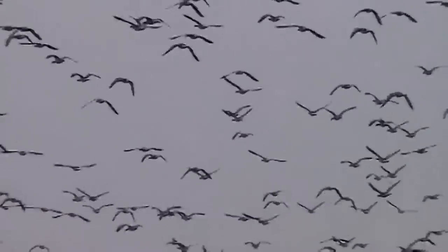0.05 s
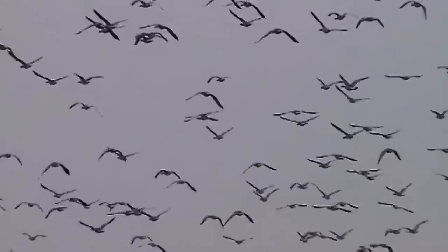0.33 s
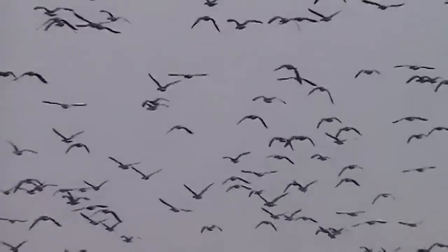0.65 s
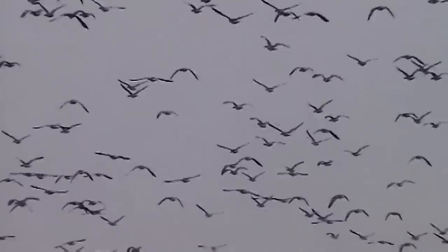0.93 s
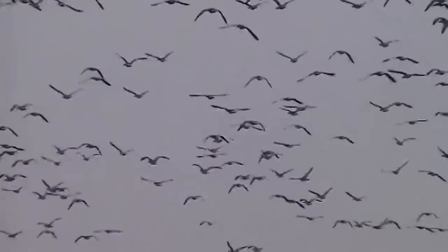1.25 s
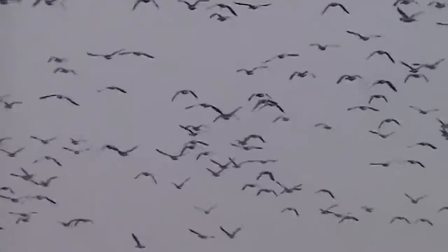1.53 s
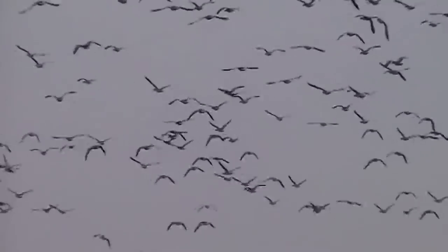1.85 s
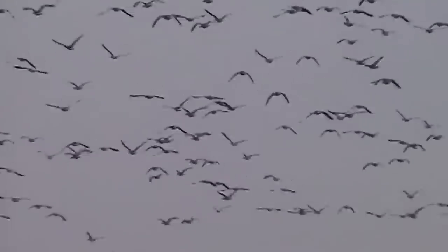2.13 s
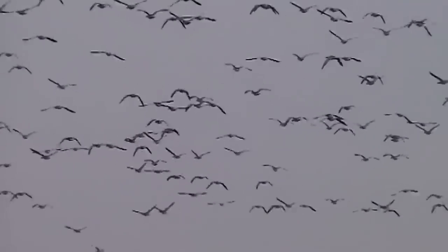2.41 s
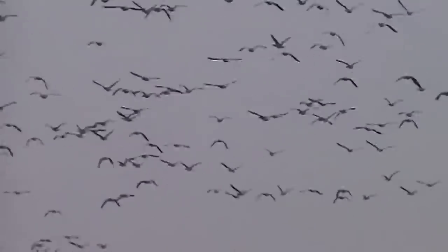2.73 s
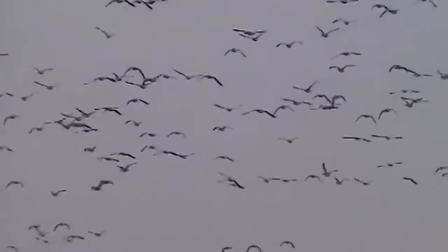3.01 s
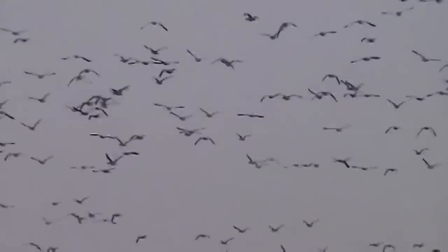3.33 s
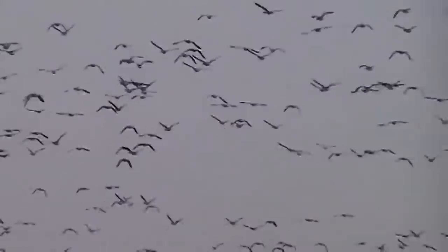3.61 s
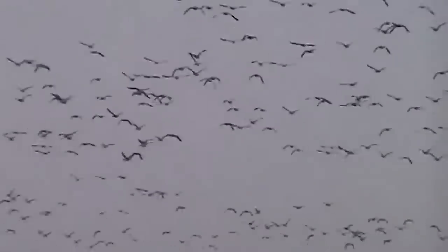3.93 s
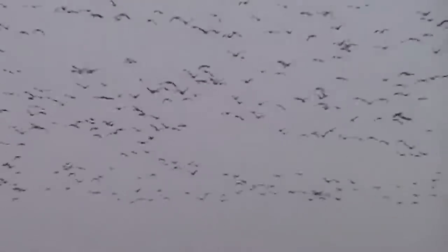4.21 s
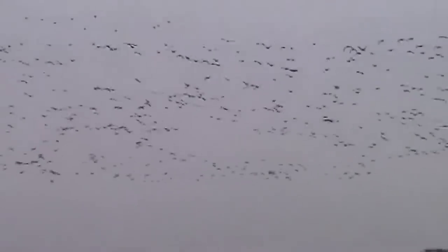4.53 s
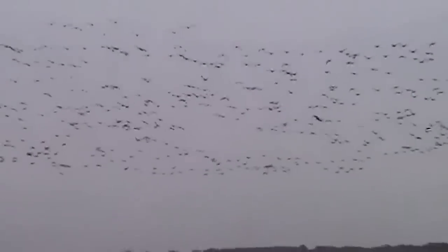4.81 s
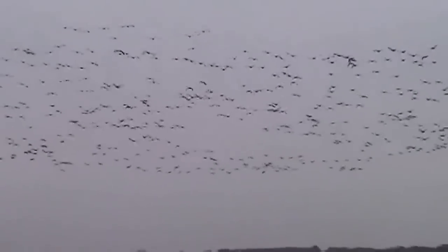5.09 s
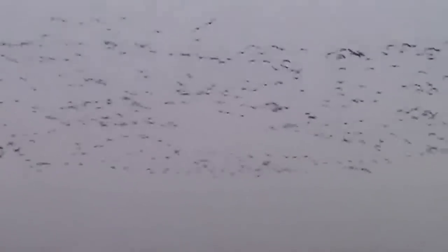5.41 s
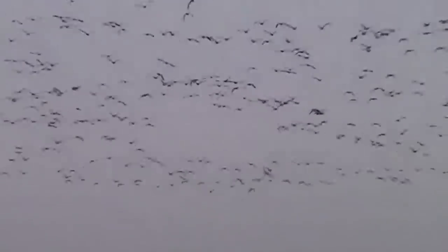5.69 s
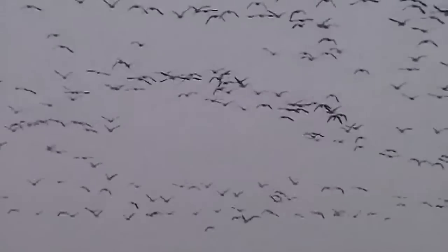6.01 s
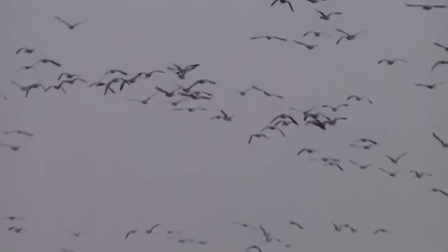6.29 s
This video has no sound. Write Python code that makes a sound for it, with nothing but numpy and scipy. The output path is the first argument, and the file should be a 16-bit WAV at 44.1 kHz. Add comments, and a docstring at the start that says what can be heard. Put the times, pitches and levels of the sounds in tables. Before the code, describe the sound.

A large flock of geese flies overhead in open country, calling from start to finish. Short, buzzy honks from near birds and higher reedy yelps stand out over an unbroken clamour of hundreds. One bird gives a hoarse bark about midway. The chorus slowly grows a little quieter and duller as the flock draws away. A very faint far engine revs in the second half, and a light breeze barely brushes the microphone.

```python
"""Open country: a large flock of geese passes overhead and slowly draws away.
Near birds honk, each joined by a few neighbours, and lone ones yelp, over a fading clamour of
hundreds and a blur of far voices. Each call is a buzz of fluttering membranes ringing in a throat.
A far engine drones, a light breeze brushes the microphone, and the camera adds a thin whine,
short whirrs and a few ticks."""
import sys
import numpy as np
from scipy import signal
from scipy.fft import rfft, irfft, next_fast_len
from scipy.io import wavfile
from scipy.ndimage import uniform_filter1d

SR = 44100
rng = np.random.default_rng(int(sys.argv[2]) if len(sys.argv) > 2 else 0)


def file_out(sig):
    """Save sig as 16-bit WAV at sys.argv[1]."""
    # one column per channel
    cols = np.atleast_2d(sig).T
    # limit, then scale
    lim = np.clip(cols, -1, 1)
    pcm = np.round(lim * 32767).astype(np.int16)
    wavfile.write(sys.argv[1], SR, pcm)


N = 280023
T = np.arange(N) / SR
HZ = np.fft.rfftfreq(next_fast_len(N), 1 / SR)

# Calls of the nearest geese: middle_s, length_s, pitch_hz, level_db, shrill_db, throat_hz
NEAR_HONKS = [(0.069, 0.13, 657.5, -29.5, 3.5, 2630), (0.266, 0.11, 430, -27, 1.5, 1800),
              (0.389, 0.12, 454.3, -28, 2, 1800), (0.551, 0.07, 446, -24.5, -0.5, 2720),
              (0.577, 0.075, 543, -26, 2.5, 1630), (0.676, 0.16, 656, -32, 2.5, 4670),
              (0.789, 0.14, 577.4, -27.5, -5, 1740), (0.958, 0.09, 382, -27.5, 3.5, 1960),
              (1.038, 0.14, 604.5, -30, 6.5, 1800), (1.152, 0.16, 444.3, -30.5, -14, 1780),
              (1.294, 0.1, 402.3, -32, 4, 2070), (1.405, 0.065, 630, -32.5, 2.5, 1260),
              (1.609, 0.12, 428.5, -29, 3, 1700), (1.709, 0.13, 451.7, -29.5, 4, 5100),
              (1.822, 0.12, 406, -29.5, 1.5, 2260), (1.92, 0.11, 474, -33, -9, 1856),
              (1.998, 0.071, 516, -31, -6.5, 2600), (2.13, 0.092, 457, -32, 4, 2250),
              (2.241, 0.15, 629, -30, 2, 1860), (2.382, 0.17, 473.5, -29.5, -11.5, 1930),
              (2.562, 0.08, 438, -30.5, -8, 1740), (2.68, 0.1, 456.4, -33, 2, 1800),
              (2.791, 0.06, 508, -30.5, -5, 2030), (2.874, 0.05, 530, -30, 3, 2160),
              (2.926, 0.075, 465, -30, 4, 1850), (3.061, 0.16, 430.4, -29.5, -10, 1670),
              (3.19, 0.17, 419.4, -28.5, -4.5, 2130), (3.438, 0.09, 455.4, -35.5, -3, 1820),
              (3.541, 0.05, 402.4, -30.5, -3.5, 1640), (3.718, 0.09, 471, -29.5, -7.5, 1860),
              (3.889, 0.19, 434, -31.5, 1, 1720), (4.17, 0.15, 652, -31.5, -2.5, 1940),
              (4.389, 0.082, 437, -33.5, -1, 1770), (4.613, 0.14, 623, -31, 1, 1870),
              (4.849, 0.11, 433.6, -31.5, -1.5, 1740), (4.966, 0.14, 481.4, -31, 4, 1936),
              (5.167, 0.23, 434, -32.5, 10, 2180), (5.278, 0.088, 448.6, -34, 0.5, 2190),
              (5.48, 0.14, 422.4, -32.5, -0.5, 850), (5.773, 0.14, 414.5, -32, -6.5, 1680),
              (5.931, 0.15, 429, -32.5, -7, 1740), (6.244, 0.2, 434, -36, 9, 1750)]
# High cries of lone birds: middle_s, length_s, pitch_hz, glide_share, level_db, shrill_db, throat_hz
LONE_YELPS = [(0.327, 0.085, 744, -0.04, -40.5, 16, 4770), (0.674, 0.11, 671, -0.005, -32.5, 5.5, 3930),
              (1.008, 0.084, 887, 0.0042, -27, -4, 1760), (1.045, 0.087, 849, -0.0096, -37.5, 8, 4240),
              (1.153, 0.13, 868, 0.0098, -34, -10, 2660), (1.615, 0.077, 854, -0.027, -31, -0.5, 1710),
              (2.282, 0.11, 830, 0.011, -39, -4, 834), (2.578, 0.08, 876, -0.029, -34.5, 2, 1750),
              (2.915, 0.06, 963, -0.02, -35.5, -3, 2790), (3.432, 0.11, 953, -0.01, -29.5, 0.5, 1870),
              (3.885, 0.085, 849, -0.012, -36.5, 2.5, 2590), (4.137, 0.11, 892, 0.02, -40, 0, 880),
              (4.631, 0.06, 755, 0.02, -42.5, 17, 3580), (4.844, 0.13, 871, -0.02, -30.5, -5.5, 1740),
              (4.947, 0.11, 992, 0.015, -35.5, -2.5, 2970), (5.131, 0.088, 868, 0.01, -40.5, -4, 2670),
              (5.343, 0.13, 884, 0.02, -35.5, -7, 1760), (5.42, 0.09, 876, 0.01, -36.5, -13, 2600),
              (5.5, 0.13, 867, -0.02, -36.5, -1, 870), (5.564, 0.08, 860, -0.04, -39.5, -5, 1700),
              (5.781, 0.11, 865, 0.016, -39.5, -7, 1720), (5.924, 0.12, 875, -0.04, -39.5, -10, 1710),
              (6.243, 0.16, 871, 0.012, -35.5, -7, 1730)]
# Shrill overtones of straining voices: middle_s, length_s, overtone_hz, glide_share, level_db
VOICE_SQUEAKS = [(0.203, 0.12, 2883, 0, -33.5), (0.435, 0.061, 4440, -0.015, -43),
                 (0.492, 0.062, 3030, -0.013, -35), (0.645, 0.05, 3820, 0.01, -39.5),
                 (1.038, 0.08, 3440, -0.04, -37.5), (1.317, 0.077, 6170, -0.09, -56),
                 (1.347, 0.054, 7340, 0, -66.5), (1.415, 0.053, 5640, 0.037, -51.5),
                 (2.094, 0.048, 5960, 0.02, -55.5), (2.452, 0.069, 5600, -0.052, -52),
                 (2.814, 0.07, 7420, -0.015, -66), (2.869, 0.053, 5550, -0.019, -52),
                 (3.413, 0.14, 5650, 0.01, -56.5)]
# How strongly a goose's throat passes each overtone: frequency_hz, level_db
THROAT_TONE = [(300, -38), (450, -45), (620, -22.5), (800, -7.5), (930, -7), (1100, -13), (1400, -5),
               (1700, 0.5), (2200, 1), (2650, -5), (3200, -10), (4300, -17.5), (5100, -24), (7000, -56)]
# Tone of the farthest birds: frequency_hz, level_db
FAR_FLOCK_TONE = [(330, -49), (470, -25), (620, -20), (760, -5), (870, -4), (1030, -13), (1450, -14),
                  (1720, 1.5), (2200, -4.5), (3100, -18), (4800, -24), (7000, -48.5), (10000, -70)]
# The flock's treble, which drops as it draws away: time_s, gain_db
TREBLE_OVER_TIME = [(0, 7.5), (1.4, 4.5), (3, 2), (4.3, 1.5), (5.2, 0.5), (6.35, -1.5)]
# A far engine revving and easing: time_s, cycle_rate_hz, level_db
ENGINE_REVS = [(0, 46.78, -87.5), (3.0, 47.06, -76), (3.7, 51.37, -64.5), (4.6, 55.6, -61.5),
               (5.05, 62.57, -57), (5.22, 63.2, -59), (5.42, 57.27, -54), (5.62, 51.43, -60),
               (5.85, 50.76, -54), (6.1, 56, -57.5), (6.35, 59.1, -52.5)]
# The tones in that engine's hum: multiple_of_cycle_rate, level_db
ENGINE_TONES = [(2, -13.5), (3, -5), (4, -2), (5.5, -9.5), (6, -4), (7, -3), (7.5, -4), (10, -3)]
# A low drone under the engine: time_s, pitch_hz, level_db
LOW_DRONE = [(0, 111.2, -70.5), (.7, 111.4, -70.5), (1.4, 110.7, -79), (2.2, 104.5, -75),
             (3.2, 105.3, -72.5), (4.2, 113.6, -78.5), (6.35, 109.6, -86)]
# Still air and microphone hiss: frequency_hz, level_db
AIR_TONE = [(20, -36), (60, -12), (110, -6), (200, -5.5), (270, 2), (370, -6), (550, 1), (2000, -6.5),
            (7500, -22.5), (11000, -30.5), (15500, -40)]
# Gusts on the microphone: middle_s, half_length_s, level_db
WIND_GUSTS = [(1.12, 0.035, -69), (5.833, 0.15, -64)]
# The camera's thin whine: time_s, level_db
CAMERA_WHINE = [(0, -78), (.9, -69.5), (2.5, -71), (3.0, -80), (3.25, -83), (3.55, -76), (4.0, -76),
                (4.5, -76), (4.75, -101)]
# The camera's short high whirrs: start_s, length_s, level_db
CAMERA_WHIRRS = [(0.022, 0.28, -69.5), (.6, .24, -84.5), (1.06, 0.5, -78.5)]
# The camera's ticks: start_s, level_db
CAMERA_TICKS = [(0.6376, -48), (3.519, -49), (3.7045, -44.5), (3.8442, -52), (4.871, -56), (5.1482, -56)]
# Scattered sound at the microphone's two openings, against the direct sound: frequency_hz, gain_db
MIC_SCATTER = [(300, -21), (850, -19.5), (1100, -14.5), (1400, -19), (1600, -29.5), (3000, -25),
               (4200, -19.5), (5200, -8), (6000, -0.5), (15000, -4)]

WAVER_PER_S = 55.2  # how fast the pitch of every voice wavers


def honk(length_s, pitch_hz, glide, throat_hz, jitter, rasp, throat_db, arch, uneven_db, crack=0.0894,
         throat_width_hz=280, attack=0.16, release=0.3, shrill_db=0, waver=0.004):
    """One goose call: membranes buzz, the throat rings, and the pitch leaps up, arches and drops."""
    t = np.arange(int(length_s * SR)) / SR
    along = t / length_s - .5  # -0.5 at the start, +0.5 at the end
    bend = 1 + glide * along - arch * along ** 2 - crack * (2 * along) ** 6
    hz = pitch_hz * (bend + jitter * wander(t, 263.5) + waver * wander(t, WAVER_PER_S))
    cycles = np.cumsum(hz) / SR
    # every call has its own mix of overtones
    overtone_hz = pitch_hz * np.arange(1, 25)
    quirk, phase = rng.standard_normal((2, len(overtone_hz)))
    overtone_db = level_at(THROAT_TONE, overtone_hz) + uneven_db * quirk - 60 * (overtone_hz > 8000)
    overtone_db += throat_db * bell(overtone_hz, throat_hz, throat_width_hz)
    overtone_db += shrill_db / (1 + (3080 / overtone_hz) ** 8)  # strain lifts the high ones
    # build one wave, then repeat it at the changing pitch
    wave = irfft(np.r_[0, amp(overtone_db) * np.exp(1j * phase)], 1024)
    voice = np.interp(cycles % 1, np.linspace(0, 1, len(wave) + 1), np.r_[wave, wave[0]])
    # the membranes flutter, and alternate strong and weak beats
    flutter = 1 + rasp * (wander(t, 260) + .5 * np.cos(np.pi * cycles))
    breath = np.clip(np.minimum((.5 + along) / attack, (.5 - along) / release), 0, 1)
    return unit(voice * flutter) * np.sin(np.pi / 2 * breath) ** 2


def near_geese(neighbours=4, join_db=0.5, join_hz=458.9):
    """The closest birds honk; neighbours join almost at once, together about as loud as the caller."""
    out = np.zeros((2, N))
    for middle_s, length_s, pitch_hz, level_db, shrill_db, throat_hz in NEAR_HONKS:
        pan = rng.uniform(-.1, 0.11)
        gain = amp(level_db + 0.3) / np.sqrt(1 + amp(join_db) ** 2)
        call = honk(length_s, pitch_hz, -0.01, throat_hz, jitter=0.0088, rasp=0.25,
                    throat_db=9.5, arch=0.2043, uneven_db=3, shrill_db=shrill_db)
        add(out, middle_s, gain * call, pan)
        neighbour_gain = gain * amp(join_db) / np.sqrt(neighbours)
        for late, pitch, glide, throat in rng.uniform(-1.7, 1.7, (neighbours, 4)):
            call = honk(length_s, join_hz * np.exp(.14 * pitch), 0.0596 * glide, 2000 + 250 * throat,
                        jitter=0.016, rasp=0.37, throat_db=3, arch=0.1289, uneven_db=1.5,
                        shrill_db=shrill_db)
            add(out, middle_s + .012 * late, neighbour_gain * call, pan)
    return out


def yelping_geese(second_pitch=0.96, second_db=-9):
    """Lone birds cry on a high pitch; a second membrane, a little flat, makes the cry reedy."""
    out = np.zeros((2, N))
    for middle_s, length_s, pitch_hz, glide, level_db, shrill_db, throat_hz in LONE_YELPS:
        for tuning, membrane_db in ((1, 0), (second_pitch, second_db)):
            call = honk(length_s, pitch_hz * tuning, glide, throat_hz, jitter=.004, rasp=.26,
                        throat_db=6, arch=0.12, uneven_db=1, crack=0.057, throat_width_hz=450,
                        shrill_db=shrill_db, waver=.005)
            add(out, middle_s, amp(level_db + membrane_db) * call)
    return out


def gruff_goose(middle_s=3.572, level_db=-29):
    """One bird gives a hoarse, low bark: its membranes flutter hard."""
    out = np.zeros((2, N))
    bark = honk(length_s=0.092, pitch_hz=388, glide=0.022, throat_hz=1200, jitter=0.034, rasp=0.83,
                throat_db=10, arch=0.13, uneven_db=0, crack=0.044, throat_width_hz=310,
                attack=0.11, release=0.14, shrill_db=-3.5)
    add(out, middle_s, amp(level_db) * bark)
    return out


def squeaks(spacing_hz=620, below_db=-6, above_db=-9):
    """A straining voice rings high in the throat: one wavering overtone between two weaker ones."""
    out = np.zeros((2, N))
    for middle_s, length_s, hz, glide, level_db in VOICE_SQUEAKS:
        t = np.arange(int(length_s * SR)) / SR
        along = t / length_s - .5
        bend = 1 + glide * along - 0.08 * along ** 2
        bend += 0.0077 * wander(t, 240) + 0.006 * wander(t, WAVER_PER_S)
        phase_per_hz = 2 * np.pi * np.cumsum(bend) / SR
        voice = np.sin(hz * phase_per_hz)
        voice += amp(below_db) * np.sin((hz - spacing_hz) * phase_per_hz)
        voice += amp(above_db) * np.sin((hz + spacing_hz) * phase_per_hz)
        flutter = 1 + 0.35 * wander(t, 200)
        add(out, middle_s, amp(level_db) * unit(voice * flutter) * np.cos(np.pi * along))
    return out


def flock(count=480, low_hz=420, high_hz=560, yelp_hz=835, high_share=.21, yelp_share=.18):
    """Hundreds of birds, nearer and farther: most cackle low, some higher, some yelp an octave up."""
    out = np.zeros((2, N))
    for k, (when, kind, size, throat) in enumerate(rng.random((count, 4))):
        pitch, glide, near, side = np.clip(rng.standard_normal(4), -1.8, 1.8)
        usual_hz = high_hz if kind < high_share else yelp_hz if kind > 1 - yelp_share else low_hz
        call = honk(length_s=.05 + .07 * size, pitch_hz=usual_hz * np.exp(.066 * pitch),
                    glide=0.07054 * glide - 0.03765, throat_hz=1550 + 1300 * throat,
                    jitter=0.014, rasp=0.26, throat_db=2.5, arch=0.17, uneven_db=2.5)
        middle_s = (k + when) / count * (N / SR + .1) - .05
        add(out, middle_s, amp(2 * near) * call, pan=0.12 * side)
    return unit(out)


def far_geese():
    """Voices too many and too far to tell apart blur into noise."""
    return stereo_noise(FAR_FLOCK_TONE, width=0.1)


def clamour():
    """The unbroken chorus behind the near calls; its lows and mids fade as the flock draws away."""
    voices = flock() + amp(-3) * far_geese()
    # so many birds call that the chorus stays even
    power = uniform_filter1d(unit(voices)[0] ** 2, 6000)
    voices = voices / np.sqrt(power + 1e-6)
    lows = colour(voices, low_pass(1250, 8))
    highs = colour(voices, 1 - low_pass(3000, 10))
    mids = voices - lows - highs
    return lows * amp(-28 - 0.5 * T) + mids * amp(-28.5 - 1.02 * T) + highs * amp(-31 + 0.22 * T)


def through_air(sound, corner_hz=4600):
    """The calls start bright and grow duller: air soaks up more treble from birds farther off."""
    treble = colour(sound, 1 - low_pass(corner_hz, 12))
    gain_db, = curves(TREBLE_OVER_TIME)
    return sound + treble * (amp(gain_db) - 1)


def field_echoes(sound, echo_db=-16, die_away_s=0.46):
    """Adds faint scattered echoes from the ground and far hedges."""
    t = np.arange(SR // 2) / SR
    bounces = rng.standard_normal((2, len(t))) * (rng.random((2, len(t))) < .04)
    mid, side = bounces * amp(-60 * t / die_away_s) * (t > .004)
    echoes = np.array([mid + 0.2 * side, mid - 0.2 * side])
    echoes /= np.linalg.norm(echoes[0])
    return sound + amp(echo_db) * signal.fftconvolve(sound, echoes, axes=1)[:, :N]


def far_engine():
    """A far engine revs up and eases, over a low drone with a blurred overtone."""
    rate_hz, engine_db = curves(ENGINE_REVS)
    cycles = np.cumsum(rate_hz * (1 + .009 * wander(T, 40))) / SR
    hum = sum(amp(level_db) * (1 + 0.7 * wander(T, 14)) * np.sin(2 * np.pi * multiple * cycles)
              for multiple, level_db in ENGINE_TONES)
    rumble = unit(colour(rng.standard_normal((2, N)), bell(HZ, middle=400, width=260)))
    engine = amp(engine_db) * (unit(hum) + amp(-3.5) * rumble)
    drone_hz, drone_db = curves(LOW_DRONE)
    drone = amp(drone_db) * unit((1 + .25 * wander(T, 3.3)) * tone(drone_hz))
    overtone = amp(-66) * unit(colour(rng.standard_normal(N), bell(HZ, middle=270, width=22)))
    return (engine + drone + overtone) * amp([[-1.3], [1.3]])  # a little to the right


def still_air(level_db=-56):
    """The quiet hush of open country, with the microphone's hiss."""
    return amp(level_db) * stereo_noise(AIR_TONE, width=0.63)


def breeze(middle_hz=75):
    """A light breeze and two gusts buffet each of the microphone's two openings separately."""
    gusts = sum(amp(level_db) * bell(T, middle_s, half_length_s)
                for middle_s, half_length_s, level_db in WIND_GUSTS)
    buffets = unit(colour(rng.standard_normal((2, N)), HZ ** 2 * low_pass(middle_hz, 4)))
    return (amp(-95.5) + gusts) * buffets


def camera(whine_hz=8990, whirr_hz=14270, tick_decay_s=0.0011):
    """A thin fluttering whine, short whirrs and dry ticks inside the camera."""
    whine = (1 + 0.45 * wander(T, 70)) * tone(whine_hz + 40 * wander(T, 200))
    whine_db, = curves(CAMERA_WHINE)
    out = np.outer([2.2, -.6], amp(whine_db) * unit(whine))  # mostly on the left
    for start_s, length_s, level_db in CAMERA_WHIRRS:
        t = np.arange(int(length_s * SR)) / SR
        whirr = (1 + .35 * wander(t, 40)) * tone(whirr_hz + 60 * wander(t, 200))
        fade = signal.windows.tukey(len(t), .4)
        add(out, start_s + length_s / 2, amp(level_db) * unit(whirr) * fade)
    t = np.arange(-400, 400) / SR
    decay = np.exp(-abs(t) / tick_decay_s) * (t >= 0)
    for start_s, level_db in CAMERA_TICKS:
        burst = uniform_filter1d(rng.standard_normal(len(t)), 2)
        add(out, start_s, amp(level_db) * burst * decay)
    return out


def amp(db):
    """Turns decibels into a number to multiply by."""
    return 10 ** (np.asarray(db) / 20)


def unit(sound):
    """Scales a sound to an average power of 1."""
    return sound / np.sqrt(np.mean(sound ** 2) + 1e-20)


def tone(hz):
    """A pure tone that follows a changing pitch."""
    return np.sin(2 * np.pi * np.cumsum(hz) / SR)


def bell(x, middle, width):
    """A smooth hump of height 1."""
    return np.exp(-((x - middle) / width) ** 2)


def wander(t, turns_per_s):
    """A random curve that drifts up and down."""
    points = rng.standard_normal(2048)
    return np.interp((t - t[0]) * turns_per_s, np.arange(len(points)), points)


def level_at(table, hz):
    """Looks up a table's decibels at the given frequencies."""
    table_hz, db = np.transpose(table)
    return np.interp(np.log(hz + 1), np.log(table_hz), db)


def curves(table):
    """Turns each column after the time into a curve over the whole scene."""
    time_s, *columns = np.transpose(table)
    return [np.interp(T, time_s, column) for column in columns]


def low_pass(corner_hz, steepness):
    """Gains that keep the frequencies below the corner."""
    return 1 / (1 + (HZ / corner_hz) ** steepness)


def colour(sound, gain):
    """Filters a sound with one gain for each frequency in HZ."""
    size = next_fast_len(N)
    return irfft(rfft(sound, size) * gain, size)[..., :N]


def stereo_noise(table, width):
    """Noise with a table's tone; width sets how unlike left and right are."""
    mid, side = rng.standard_normal((2, N))
    noise = np.array([mid + width * side, mid - width * side])
    return unit(colour(noise, amp(level_at(table, HZ))))


def add(mix, middle_s, sound, pan=0):
    """Places a sound by its middle; a pan above 0 moves it left."""
    start = round(middle_s * SR) - len(sound) // 2
    part = mix[:, max(start, 0):max(start + len(sound), 0)]
    part += np.outer([1 + pan, 1 - pan], sound[max(-start, 0):][:part.shape[1]])


def scene():
    """Geese over the fields, with the faint background."""
    geese = through_air(near_geese() + yelping_geese() + gruff_goose() + clamour()) + squeaks()
    return field_echoes(geese) + far_engine() + still_air() + breeze() + camera()


def record(dry, lead=0.051, late_s=0.0085, ripple_per_hz=0.0086, top_hz=15700):
    """The microphone's two openings each hear the treble their own way; the very top is cut off."""
    dry = dry * signal.windows.tukey(N, .0015)
    # one opening leads a little, and scattered sound arrives late with a jumbled phase
    lag_cycles = HZ * late_s + .5 * wander(HZ, ripple_per_hz)
    scattered = amp(level_at(MIC_SCATTER, HZ)) * np.exp(-2j * np.pi * lag_cycles)
    side = colour(dry.mean(0), 1j * lead + scattered)
    left_right = (dry + np.array([side, -side])) * amp([[-.2], [.2]])
    top_cut = signal.firwin(511, top_hz, window=("kaiser", 9), fs=SR)
    return signal.oaconvolve(left_right, top_cut[None], "same")


dry = scene()
out = record(dry)
file_out(out)
```